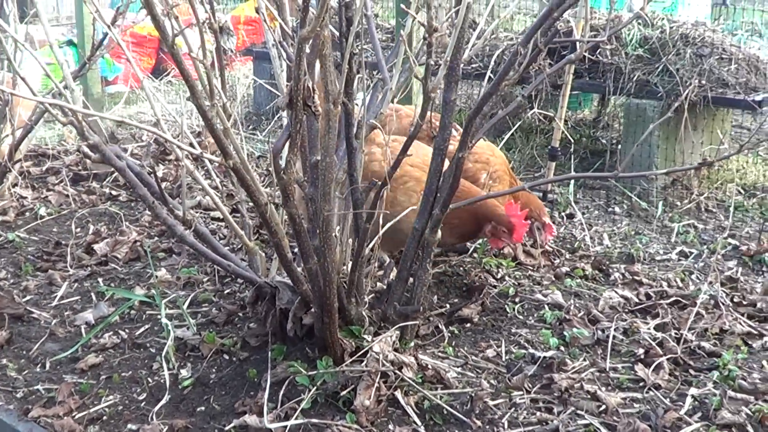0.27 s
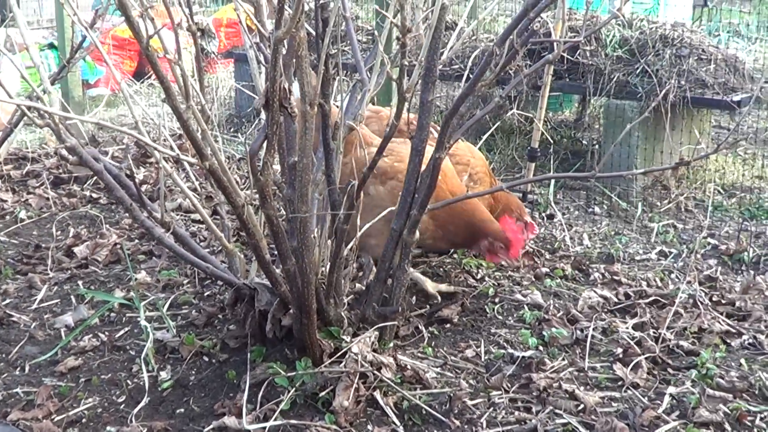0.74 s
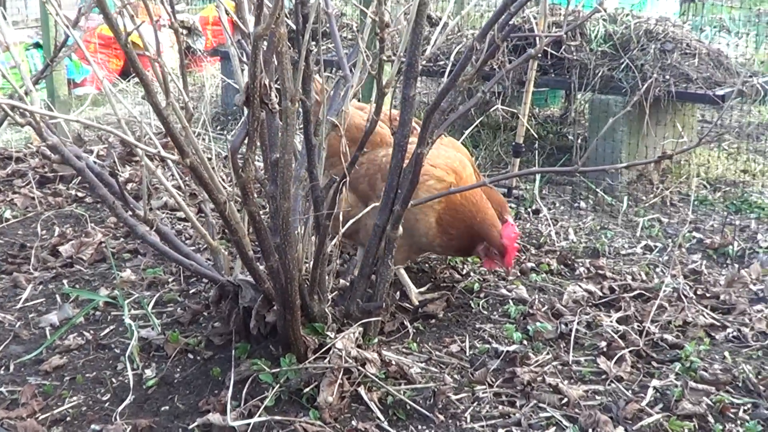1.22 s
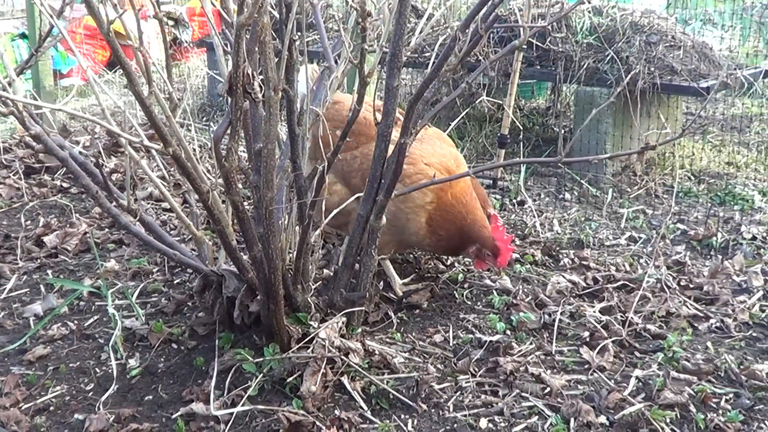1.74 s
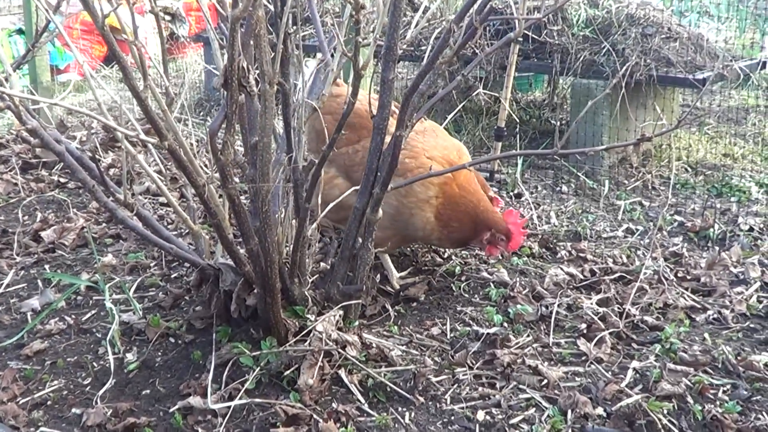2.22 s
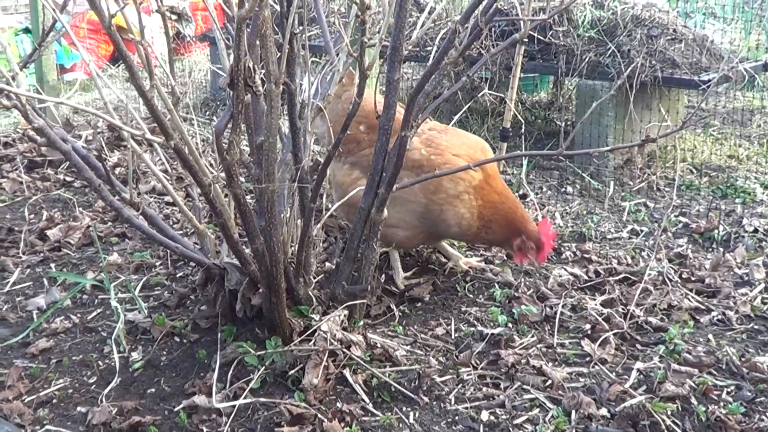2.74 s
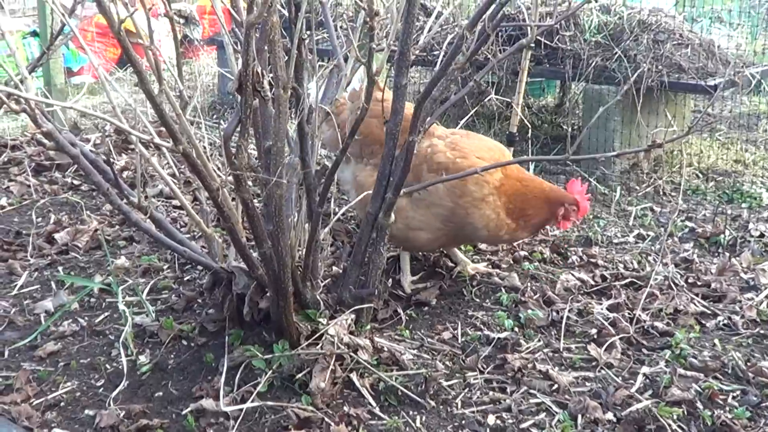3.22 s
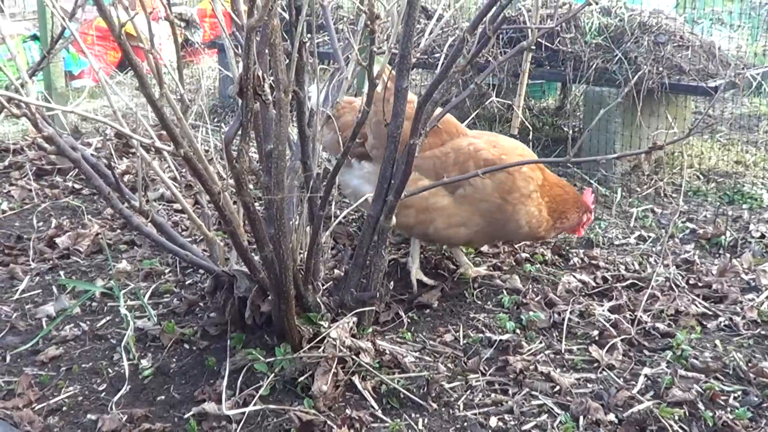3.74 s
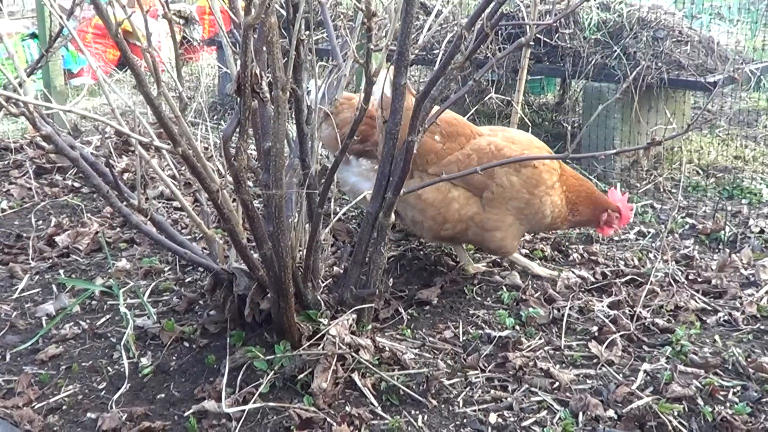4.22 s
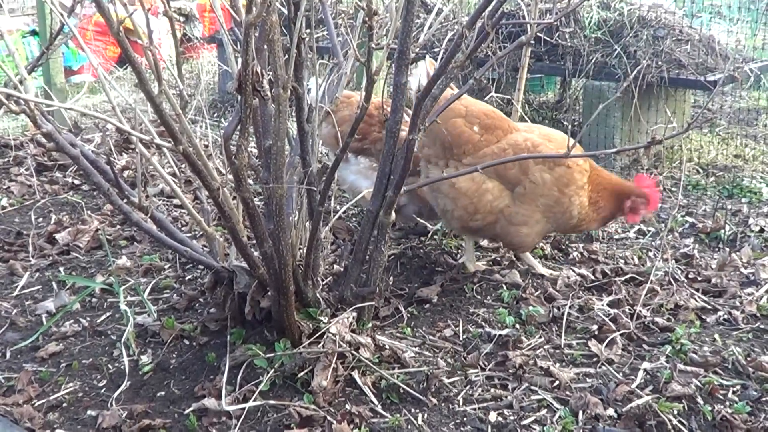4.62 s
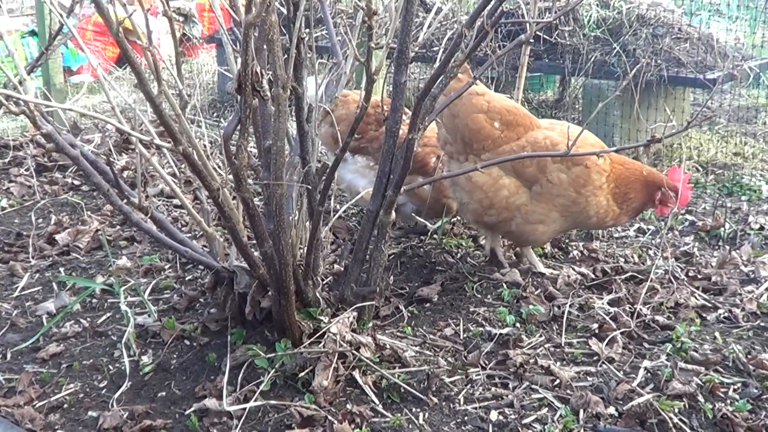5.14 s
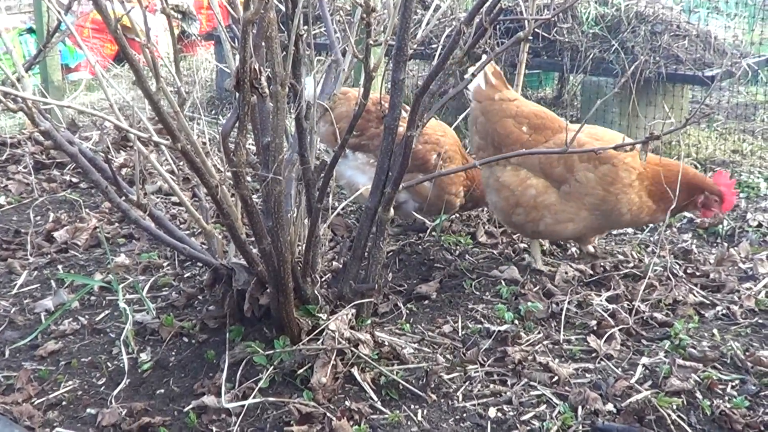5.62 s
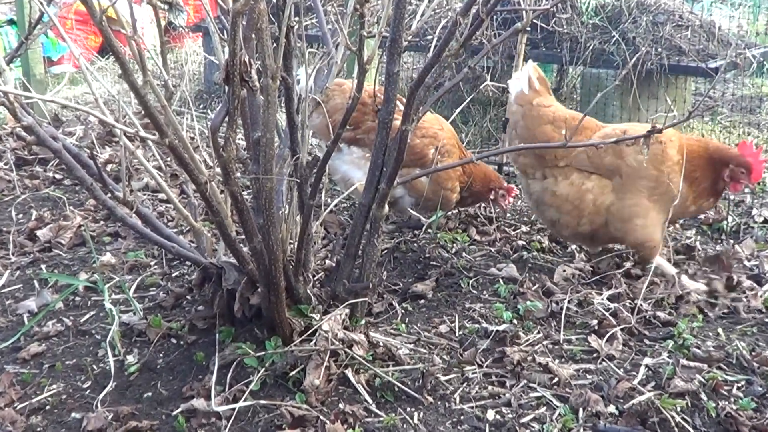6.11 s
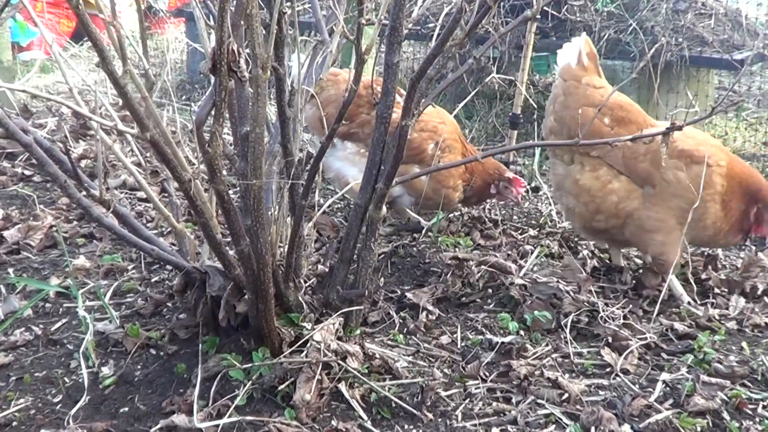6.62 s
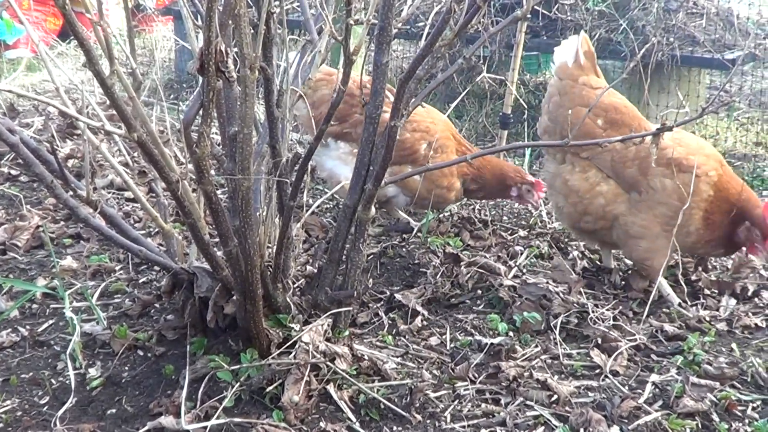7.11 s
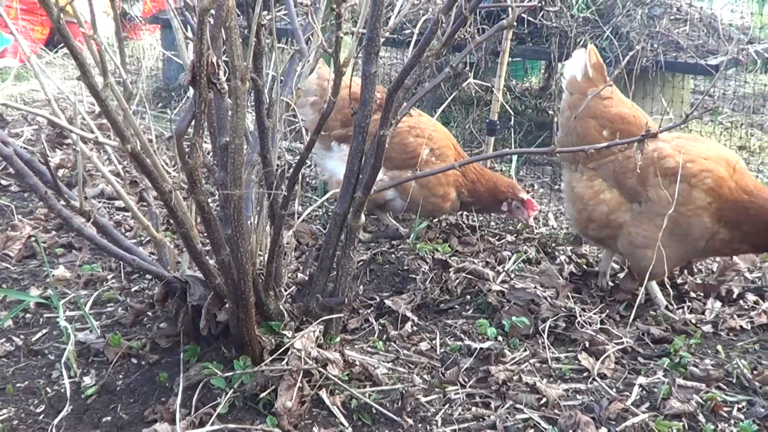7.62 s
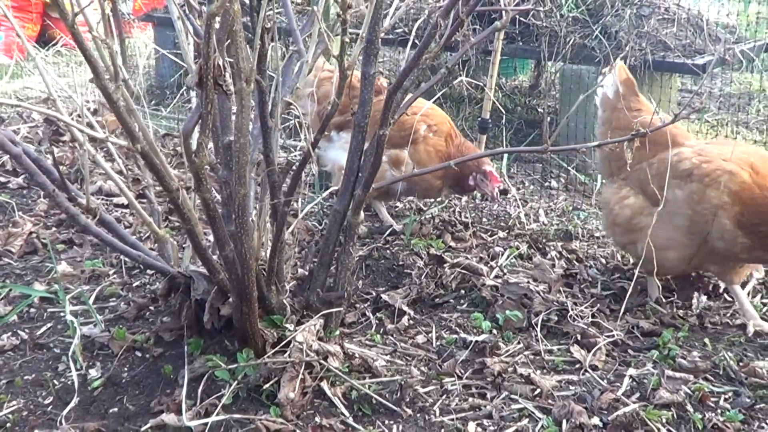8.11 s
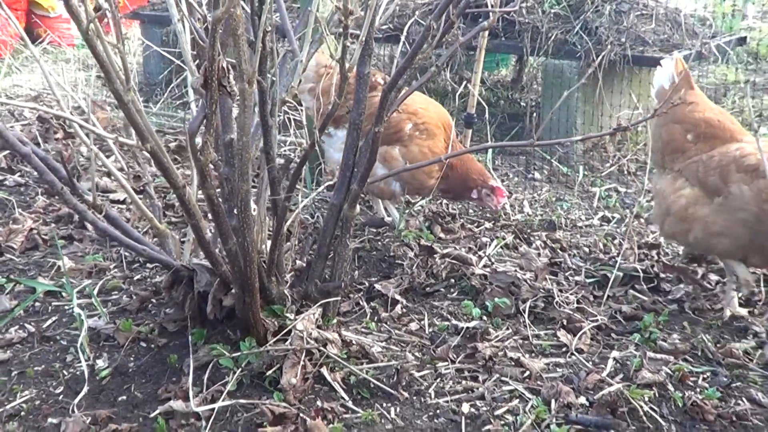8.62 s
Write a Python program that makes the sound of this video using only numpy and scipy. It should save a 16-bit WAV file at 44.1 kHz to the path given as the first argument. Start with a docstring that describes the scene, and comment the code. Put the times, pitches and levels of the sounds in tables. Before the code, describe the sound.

In a garden with a faint hum of far traffic, hens forage a few metres away, crumpling dry leaves and cracking small twigs in short bursts. Thin bird whistles come first, then two rising finch chirps and faint twittering. Soft footfalls lead to a loud, brief spell of scratching with sharp snaps and more chirps. Finally a bird close by sings fast trills that grow louder while the rustling goes on.

```python
"""Two hens scratch, step and peck in dry leaves under a shrub, a few metres away.
From the start, far traffic hums, small birds wheeze and whistle, leaves crumple in swarms of tiny
cracks and twigs snap. Near 2 s feet thud on the soil and a finch calls; then a far bird twitters
and faint drones come and go. Around 6 s one hen rakes hard while the finch calls again.
From 7.5 s a nearby bird sings quick trills over more rustling."""
import sys
import numpy as np
from scipy import signal
from scipy.fft import rfft, irfft, next_fast_len
from scipy.io import wavfile
from scipy.ndimage import uniform_filter1d

SR = 44100
rng = np.random.default_rng(int(sys.argv[2]) if len(sys.argv) > 2 else 0)


def master(y):
    """Save y as 16-bit WAV."""
    cut = np.clip(np.atleast_2d(y).T, -1, 1)
    pcm = np.round(cut * 32767)  # scale
    wavfile.write(sys.argv[1], SR, pcm.astype(np.int16))


N = 390718
T = np.arange(N) / SR


def undb(db):
    """Turn decibels into a number to multiply a sound by."""
    return 10 ** (np.asarray(db) / 20)


def unit(x):
    """Scale a sound to an average power of 1."""
    return x / np.sqrt(np.mean(x ** 2) + 1e-20)


def seconds(length):
    """The time of each sample in a short sound."""
    return np.arange(int(length * SR)) / SR


def add(track, start, sound):
    """Mix a sound into a track at a time in seconds."""
    i = int(round(start * SR))
    sound, i = sound[max(-i, 0):], max(i, 0)
    track[i:i + len(sound)] += sound[:max(N - i, 0)]


def colour(x, points):
    """Turn lows and highs up or down along (frequency [Hz], gain [dB]) points."""
    hz, db = np.transpose(points)
    size = next_fast_len(len(x), real=True)
    bins = np.maximum(np.arange(size // 2 + 1) * SR / size, 1)
    gain = undb(np.interp(np.log(bins), np.log(hz), db))
    return irfft(rfft(x, size) * gain, size)[:len(x)]


def band(x, low_hz, high_hz):
    """Keep the part of a sound between two frequencies."""
    edges = [low_hz, min(high_hz, SR / 2 - 1)]
    return signal.sosfilt(signal.butter(2, edges, "band", fs=SR, output="sos"), x)


def walk(rate):
    """A random wobble of about 1 either way that heads for a new value rate times a second."""
    return np.interp(T * rate, np.arange(1024), rng.standard_normal(1024))


def place(x, pan_db, wet_db, t60, gap, density, width):
    """Set a sound left or right, with echoes off stems, fence and sheds that fade 60 dB in t60 s."""
    t = seconds(.6)
    echoes = rng.standard_normal((2, len(t))) * (rng.random((2, len(t))) < density / SR)
    echoes *= undb(-60 * t / t60) * (t > gap)
    mid, side = (unit(e) / np.sqrt(len(t)) for e in echoes)
    # two close microphones share most of each echo, above all in bass and treble
    side = width * colour(side, [(100, -3), (500, -2), (4000, 3.5), (8000, 4), (12000, -31)])
    response = (t == 0) + undb(wet_db) * np.array([mid + side, mid - side])
    pan = undb(np.array([[pan_db], [-pan_db]]) / 2)
    return pan * signal.oaconvolve(x[None], response, axes=1)[:, :N]


def traffic(db):
    """Far traffic blends into a wide hum whose middle pitches slowly swell."""
    # tone of the hum: (frequency [Hz], gain [dB])
    tone = [(25, -13), (60, -6), (110, -3), (225, -4), (350, -5), (540, -1.5), (760, -0.5), (1170, -5),
            (1800, -12.5), (2850, -14.5), (4600, -15.5), (7000, -18), (15500, -19.5)]
    # how much left and right differ: (frequency [Hz], unshared against shared sound [dB])
    spread = [(40, -21), (150, -19.5), (300, -6), (650, -8.5), (1200, -2.5), (3000, -1), (7000, -3),
              (12000, -14.5)]
    # rise and fall of the traffic: (time [s], relative level [dB])
    swells = [(0, -57.5), (1.1, -58.5), (1.5, -59), (4.5, -57.5), (5.95, -58), (6.27, -54), (7.3, -58.5),
              (8.86, -56.5)]
    times, swell_db = np.transpose(swells)
    swell = undb(np.interp(T, times, swell_db - np.median(swell_db)) + 0.99 * walk(6))
    mid, side = (unit(colour(rng.standard_normal(N), tone)) for _ in range(2))
    hum = undb(db) * (mid + np.array([[1], [-1]]) * colour(side, spread))
    road = np.array([colour(c, [(150, -30), (450, 0), (1200, 0), (3000, -30)]) for c in hum])
    return hum + road * (swell * undb([[-.7], [.7]]) - 1)


def whine(hz, db):
    """A camera gives off one faint, very high tone."""
    return undb(db) * np.sin(2 * np.pi * hz * T)


def wheezes(trill_hz, depth, unevenness):
    """A bird's whistle sweeps up and down so fast that it buzzes, lingering at each low point."""
    # far wheezes: (start [s], length [s], first pitch [Hz], last pitch [Hz], level [dB])
    calls = [(-.1, 0.68, 4296, 4214, -52.5), (0.417, 0.26, 3970, 3690, -56), (7.022, .3, 3930, 4260, -54),
             (7.241, 0.21, 3980, 3720, -57)]
    out = np.zeros(N)
    swing = np.abs(np.sin(np.pi * np.cumsum(trill_hz * (1 + unevenness * walk(60))) / SR))
    jitter = 0.0242 * unit(uniform_filter1d(rng.standard_normal(N), size=50))
    sweep = 1 + depth * (2 * swing ** 2.6 - 1) + jitter
    for start, length, first_hz, last_hz, db in calls:
        t = seconds(length)
        hz = np.interp(t, [0, length], [first_hz, last_hz]) * np.roll(sweep, -int(start * SR))[:len(t)]
        fade = np.sin(np.pi * t / length) ** .5
        add(out, start, undb(db) * fade * np.sin(2 * np.pi * np.cumsum(hz) / SR))
    return out


def stirring(rest_db, rake_db, rise_share, spring_s, settle_s, settle_db):
    """How hard the hens work the leaves over time; the leaves never quite rest."""
    # steps and pecks: (start [s], length [s], level [dB])
    rustles = [(0, 0.012, -47.5), (0.039, 0.0079, -54.5), (0.116, 0.2, -67), (0.42, 0.086, -57),
               (0.468, 0.16, -49.5), (0.739, 0.067, -49), (0.844, 0.075, -55.5), (1.012, 0.054, -49.5),
               (1.35, 0.017, -57.5), (1.617, 0.019, -54.5), (1.676, 0.022, -55), (1.869, 0.025, -45),
               (2.425, 0.03, -47.5), (2.639, 0.021, -46), (2.724, 0.099, -62), (3.493, 0.033, -54),
               (3.61, 0.013, -57), (3.875, 0.12, -53), (4.285, 0.085, -51), (4.762, 0.049, -49),
               (5.457, 0.095, -47), (5.549, 0.13, -51.5), (5.707, 0.18, -58.5), (5.89, 0.091, -38),
               (7.662, 0.19, -51), (7.814, 0.072, -44.5), (7.873, 0.203, -44.5), (8.054, 0.13, -42),
               (8.207, 0.39, -55.5), (8.468, 0.14, -43.5), (8.642, 0.12, -47), (8.775, 0.015, -42.5),
               (8.822, 0.035, -51)]
    # one hen rakes hard with her feet: (time [s], relative level [dB])
    rake = [(6.01, -48.5), (6.14, -29.5), (6.308, -27), (6.318, -31), (6.386, -28), (6.43, -35),
            (6.59, -33), (6.658, -45.5), (6.83, -65.5)]
    times, levels = np.transpose(rake)
    raking = (T >= times[0]) * (T <= times[-1])
    effort = undb(rest_db) + undb(rake_db + np.interp(T, times, levels)) * raking
    t = seconds(.6)
    for start, length, db in rustles:
        # the leaves give way, spring back, then go on settling softly
        rise = np.minimum(t / (rise_share * length), 1)
        after = np.maximum(t - length, 0)
        release = np.maximum(np.exp(-after / spring_s), undb(settle_db) * np.exp(-after / settle_s))
        add(effort, start, undb(db) * rise * release)
    return effort


def leaves(effort, crack_density, spread_db, rub_db, scrap_s, clump_db):
    """Dry leaves crumple in tiny cracks, each ringing a scrap of leaf; harder work makes more."""
    # tone of crumpling leaves: (frequency [Hz], gain [dB])
    tone = [(200, -8.5), (380, -28), (750, -11), (1500, -10), (2500, -10.5), (3500, -5), (5000, -1),
            (8000, 3), (10500, -0.5), (13000, -4), (16000, -9)]
    cracks_per_s = crack_density * (effort / undb(-46.5) + 0.0072) ** .72 * undb(clump_db * walk(70))
    size = undb(spread_db * np.minimum(rng.exponential(size=N), 4)) * rng.choice([-1, 1], N)
    cracks = size * (rng.random(N) < cracks_per_s / SR)
    scrap = rng.integers(0, 16, N)
    crackle, t = np.zeros(N), seconds(.006)
    for k, hz in enumerate(np.linspace(2000, 15000, 16)):
        burst = rng.standard_normal(len(t)) * (np.exp(-t / scrap_s) + 0.27 * np.exp(-t / 0.0031))
        ring = unit(band(burst, hz * 0.75, hz * 1.4)) + .5 * unit(burst)
        crackle += signal.oaconvolve(cracks * (scrap == k), ring)[:N]
    # the effort is shared among the cracks of each moment, over a smooth rub of leaf on leaf
    power = uniform_filter1d(crackle ** 2, int(0.03 * SR))
    crackle /= np.sqrt(power + 0.012 * np.mean(power))
    rub = undb(rub_db) * rng.standard_normal(N)
    return unit(colour(crackle + rub, tone)) * effort


def note(length, pitches_hz, rasp, depth=0.086, flutter_db=2.5):
    """One bird note gliding through three pitches; rasp shakes its pitch very fast."""
    t = seconds(length)
    progress = t / length
    hz = np.polyval(np.polyfit([0, .5, 1], pitches_hz, 2), progress)
    shake = np.interp(t * 700, np.arange(128), rng.standard_normal(128))
    flutter = np.interp(t * 200, np.arange(64), rng.standard_normal(64))
    phase = 2 * np.pi * np.cumsum(hz * (1 + depth * rasp * shake)) / SR
    fade = np.sin(np.pi * progress) ** 0.44
    return np.sqrt(2) * undb(flutter_db * flutter) * fade * np.sin(phase)


def whistles(early_share=.72):
    """A bird further off whistles thin notes that glide fast at first, then level out."""
    # (start [s], length [s], first pitch [Hz], last pitch [Hz], relative level [dB], rasp [0-1])
    thin_notes = [(0.063, 0.055, 7680, 6300, -47, 0.2), (0.159, 0.06, 4880, 5800, -42.5, .58),
                  (0.286, .09, 3590, 4750, -43.5, 0.4), (0.726, 0.065, 5630, 5670, -44, .12),
                  (0.806, 0.045, 5800, 5280, -38.5, 0.05), (.892, 0.05, 4280, 4740, -46, 0.92),
                  (0.944, 0.061, 4430, 3720, -50.5, .4), (1.415, 0.077, 3940, 4150, -54.5, 0.18),
                  (5.074, 0.067, 4450, 4710, -57.5, 0.6), (5.228, 0.067, 4670, 5770, -46.5, .17),
                  (5.346, .06, 7250, 6770, -51.5, 0.39), (5.447, 0.035, 5200, 4770, -47.5, 0.3),
                  (5.576, 0.053, 5620, 4800, -46, 1), (5.702, .12, 6210, 5700, -48, 0.13),
                  (5.965, 0.086, 4720, 4670, -42, 0.29)]
    out = np.zeros(N)
    for start, length, first_hz, last_hz, db, rasp in thin_notes:
        middle_hz = first_hz + early_share * (last_hz - first_hz)
        add(out, start, undb(db) * note(length, [first_hz, middle_hz, last_hz], rasp))
    return out


def stalks(effort, most_per_s, busy_db, count=500):
    """Rows for snaps(): small stalks break by chance, more often and louder under harder work."""
    at, luck = rng.random((count, 2)).T
    loud, high, woody = rng.standard_normal((count, 3)).T
    busy = effort[(at * N).astype(int)] / undb(busy_db)
    db = -37.5 + 0.07 * 20 * np.log10(busy) + 1.5 * loud
    ring_hz = np.clip(8040 * np.exp(0.29 * high), 3000, 12000)
    rows = np.transpose([at * N / SR, db, ring_hz, -25 + 4 * woody])
    chance = np.minimum(busy, 1) ** 1.5 * most_per_s * N / SR / count
    return rows[luck < chance]


def snaps(small_stalks, ring_s, knock_hz, knock_s, knock_db, tick_db, splinter_db, splinter_s):
    """A twig or stalk breaks: a sharp tick and ring, a lower woody knock and a spray of splinters."""
    # the loudest breaks: (time [s], relative level [dB], ring pitch [Hz], relative knock level [dB])
    big_snaps = [(.5324, -31, 4420, 0), (.627, -29.5, 7270, -26), (.872, -34, 10440, -29.5),
                 (.9134, -31, 9500, -26), (1.6187, -32.5, 11400, -28), (1.6916, -34, 6640, -28),
                 (1.8886, -24, 9900, -20), (2.4504, -24, 7750, -39), (2.6577, -31.5, 7500, -6),
                 (2.7496, -37, 7200, -22.5), (2.9738, -32, 7540, -2), (3.0284, -38.5, 7300, -20),
                 (3.6137, -35, 11800, -25), (4.2462, -38.5, 3450, -22), (4.3214, -26.5, 11800, -34),
                 (4.769, -37, 9000, -18), (5.377, -18.5, 6660, -13.5), (5.4855, -30.5, 8000, -27),
                 (5.5276, -33, 8000, -26.5), (5.5436, -27.5, 8350, -31), (5.9725, -14.5, 6200, -15.5),
                 (6.3015, -8, 8900, -41), (6.5946, -21, 4420, -22), (6.7166, -27, 4380, -3),
                 (6.8458, -36, 6850, -29), (7.457, -25, 6540, -6.5), (7.4817, -25, 5960, -2.5),
                 (7.7798, -24, 3140, -25), (8.007, -23.5, 4850, -16), (8.1792, -29, 7800, 0),
                 (8.1945, -23.5, 4500, 5), (8.4304, -25, 6800, -26)]
    out, t = np.zeros(N), seconds(.03)
    tick = unit(band(1. * (t == 0), 8600, 14300))
    for start, db, hz, wood_db in [*big_snaps, *small_stalks]:
        wood_hz = knock_hz * np.exp(0.243 * rng.standard_normal(3)) * [.78, 1, 1.3]
        ring = unit(np.sin(2 * np.pi * hz * t) * t * np.exp(-t / ring_s))
        wood = unit(sum(np.sin(2 * np.pi * f * t) for f in wood_hz) * t ** .5 * np.exp(-t / knock_s))
        spray = unit(band(rng.standard_normal(len(t)), hz * 0.52, hz * 1.27) * np.exp(-t / splinter_s))
        snap = ring + undb(tick_db) * tick + undb(splinter_db) * spray + undb(knock_db + wood_db) * wood
        strength = np.sqrt(np.sum(snap ** 2) / (.001 * SR))  # as if packed into one millisecond
        add(out, start, undb(db) * snap / strength)
    return out


def trill(syllable, start_s, db, count=1, period_s=0, swell_db=0):
    """A bird sings a short pattern count times at an even pace, louder by swell_db each time."""
    # named patterns, a row a note: (delay [s], length [s], first pitch [Hz], middle pitch [Hz],
    # last pitch [Hz], relative level [dB], rasp [0-1])
    syllables = { "opening": [(0, 0.016, 5900, 5100, 4640, -5, .1), (.02, .026, 3090, 3610, 4800, -3, 1),
                 (.046, .042, 4470, 4390, 4500, 0, .9)], "slur": [(0, 0.0218, 4700, 3850, 3600, 1.5, 0.45)],
                 "swoop": [(0, 0.034, 5970, 4720, 3850, -3.5, 0.56),
                 (.046, 0.0515, 3280, 3890, 3720, -1.5, .15), (.092, .022, 3800, 3180, 2300, 1, 0.35)],
                 "tumble": [(0, 0.0213, 3960, 4400, 4650, -5, 0.56), (.02, .025, 4140, 3460, 2740, 0, 0.3),
                 (.039, .017, 3200, 3650, 3750, -3, .3), (.063, .029, 2506, 2950, 2100, -3, 0.45)],
                 "flourish": [(0, .018, 4300, 5600, 6600, -3, 1),
                 (.023, 0.0216, 6450, 5450, 4930, 1.5, 0.76), (.08, .028, 3200, 4600, 5880, 0.5, 1)]}
    out = np.zeros(N)
    for k in range(count):
        for delay, length, *pitches_hz, note_db, rasp in syllables[syllable]:
            gain = undb(db + k * swell_db + note_db)
            add(out, start_s + k * period_s + delay, gain * note(length, pitches_hz, rasp))
    return out


def thuds(decay_s, soil_hz, loose_db):
    """Soft soil gives a dull bump under each foot, with a short rumble of loose crumbs."""
    # feet landing: (time [s], level [dB])
    steps = [(1.851, -59.5), (2.02, -58), (3.874, -53), (3.968, -54.5), (5.286, -52.5), (5.449, -50),
             (5.53, -50.5), (5.68, -51), (6.03, -52.5), (6.49, -49), (6.53, -55), (6.585, -62),
             (6.64, -51.5), (7.41, -58)]
    out, t = np.zeros(N), seconds(.25)
    for start, db in steps:
        hz = soil_hz * np.exp(0.32 * rng.standard_normal())
        bump = np.sin(2 * np.pi * hz * t) * t / decay_s * np.exp(1 - t / decay_s)
        crumbs = unit(band(rng.standard_normal(len(t)), soil_hz * 0.56, soil_hz * 1.73))
        crumbs *= np.minimum(t / decay_s, 1) * np.exp(-t / 0.073)
        add(out, start, undb(db) * (bump + undb(loose_db) * crumbs))
    return out


def finch(beak_hz, beak_width_hz, rasp, flutter_db, waver, rise_s=.043, hold_s=.033):
    """A finch sweeps up to a whistle; its overtones grow as they pass the pitch its beak rings at."""
    # (time [s], top pitch [Hz], level [dB], overtone boost [dB])
    calls = [(2.025, 4510, -33, 4.5), (2.2553, 4310, -31.5, -0.5), (5.839, 4436, -33, 0),
             (6.042, 4340, -32, -0.5), (6.35, 4300, -33.5, -2), (6.668, 4440, -46, -12)]
    out, t = np.zeros(N), seconds(.13)
    rise, held = np.minimum(t / rise_s, 1), np.maximum(t - rise_s, 0)
    pitch_share = .44 + .56 * rise - 0.754 * held  # climbs, then sags
    level_db = np.interp(rise, [0, .88, 1], [-31.5, -6, 0]) - 950 * np.maximum(held - hold_s, 0)
    overtone_db = 12.5 - 33 * rise ** 2.8  # starts rich, ends nearly pure
    fade_in = np.minimum(t / .005, 1)
    for start, top_hz, db, bright_db in calls:
        hz = top_hz * pitch_share * (1 + waver * walk(90.6)[:len(t)])
        bright = undb(overtone_db + bright_db)
        shake = unit(uniform_filter1d(rng.standard_normal(SR // 4), size=20))[:len(t)]
        jitter = rasp * np.minimum(bright + 0.05, 1.5) * shake
        phase = 2 * np.pi * np.cumsum(hz * (1 + jitter)) / SR
        overtones = sum(np.sin(k * phase) * np.exp(-((k * hz - beak_hz) / beak_width_hz) ** 2)
                        for k in range(2, 7))
        voice = np.sin(phase) + bright * overtones
        add(out, start, np.sqrt(2) * fade_in * undb(db + level_db) * voice)
    return out * undb(flutter_db * walk(120))


def twitter(start_s, end_s, notes_per_s, pitch_hz, db):
    """A far bird chatters softly in short notes that slide up or down at random."""
    out = np.zeros(N)
    for k, (late, high, slope, loud) in enumerate(rng.standard_normal((40, 4))):
        at = start_s + (k + 0.32 * late) / notes_per_s
        pitches_hz = pitch_hz * np.exp(0.075 * high + 0.15 * np.sign(slope) * np.array([1, 0, -.7]))
        add(out, at, (at < end_s) * undb(db + 2 * loud) * note(0.0222, pitches_hz, rasp=0.39))
    return out


def drones():
    """Faint far-off drones, each a narrow band of noise, fade in and out."""
    # (loudest moment [s], half length [s], pitch [Hz], level [dB])
    swells = [(3.05, 0.23, 390, -64), (3.56, 0.29, 340, -66), (4.1, 0.17, 520, -63), (5.27, 1, 530, -66.5),
              (4.44, 0.38, 660, -61.5)]
    out = np.zeros(N)
    for at, half, hz, db in swells:
        drone = unit(band(rng.standard_normal(N), hz * .965, hz * 1.035))
        out += undb(db) * drone * np.exp(-((T - at) / half) ** 2)
    return out


def song():
    """A bird close by sings an opening, three trills that grow louder, then a flourish."""
    return (trill("opening", start_s=7.562, db=-45.5)
            + trill("slur", start_s=7.728, db=-44.5, count=4, period_s=.0635, swell_db=0.4)
            + trill("swoop", start_s=8.001, db=-42.0, count=2, period_s=.176, swell_db=2.5)
            + trill("tumble", start_s=8.336, db=-38.0, count=3, period_s=.1335, swell_db=1.15)
            + trill("flourish", start_s=8.765, db=-36.0))


def scene():
    """Hens on the ground nearby, birds in the shrubs and traffic far away."""
    air = traffic(db=-53) + drones() + whine(hz=15625, db=-61)
    feet = place(thuds(decay_s=0.008, soil_hz=116.3, loose_db=-3),
                 pan_db=0, wet_db=-5.5, t60=0.11, gap=.003, density=1000, width=1)
    caller = place(finch(beak_hz=6600, beak_width_hz=1770, rasp=0.054, flutter_db=0.3, waver=0.0081),
                   pan_db=-2, wet_db=-8, t60=0.35, gap=0.0044, density=900, width=0.43)
    singer = place(song(), pan_db=-1.2, wet_db=-6, t60=0.43, gap=0.0029, density=1700, width=0.36)
    whistler = place(undb(-6) * whistles(),
                     pan_db=-2, wet_db=1.1, t60=0.44, gap=0.0013, density=2300, width=.55)
    far_calls = (wheezes(trill_hz=72.2, depth=.17, unevenness=0.13)
                 + trill("slur", start_s=1.563, db=-57.5, count=3, period_s=0.073, swell_db=1)
                 + twitter(start_s=2.4, end_s=3.9, notes_per_s=15, pitch_hz=4100, db=-62))
    far_birds = place(far_calls, pan_db=0.5, wet_db=-2.5, t60=0.3, gap=.004, density=2000, width=0.64)
    effort = stirring(rest_db=-67.5, rake_db=-0.08, rise_share=0.25,
                      spring_s=0.016, settle_s=0.044, settle_db=-9.5)
    rustle = leaves(effort, crack_density=950, spread_db=4.8, rub_db=-2, scrap_s=0.000078, clump_db=4)
    small_stalks = stalks(effort, most_per_s=20, busy_db=-52)
    twigs = undb(-6) * snaps(small_stalks, ring_s=0.0002, knock_hz=2363, knock_s=0.0021, knock_db=2.5,
                             tick_db=-6, splinter_db=0.5, splinter_s=0.0017)
    hens = place(rustle + twigs, pan_db=-0.8, wet_db=-12, t60=0.084, gap=.0018, density=3500, width=.76)
    return hens + feet + caller + singer + whistler + far_birds + air


def record(dry, low_hz=38, top_hz=15950):
    """The camera thins the deep bass and cuts the top of the treble."""
    thin = signal.sosfilt(signal.butter(2, low_hz, "high", fs=SR, output="sos"), dry)
    return signal.sosfilt(signal.ellip(10, .2, 70, top_hz, fs=SR, output="sos"), thin)


dry = scene()
out = record(dry)
master(out)
```